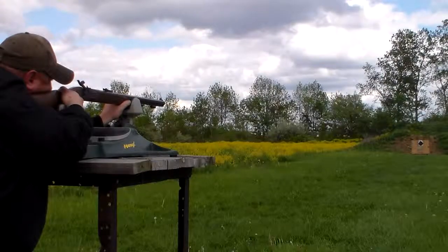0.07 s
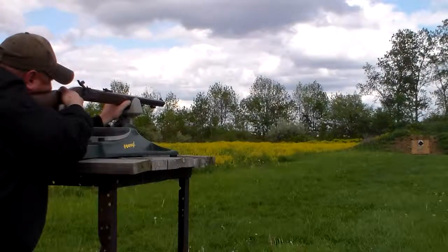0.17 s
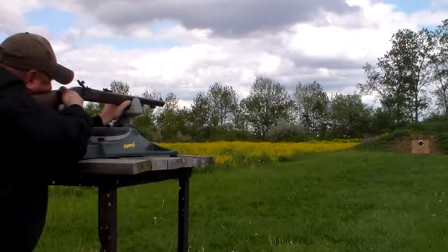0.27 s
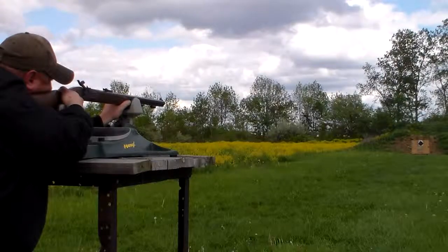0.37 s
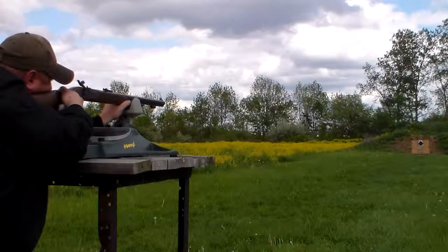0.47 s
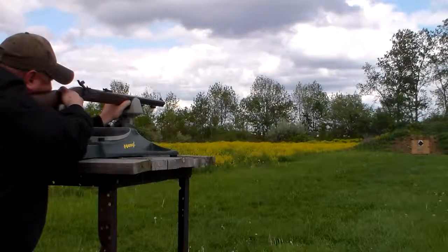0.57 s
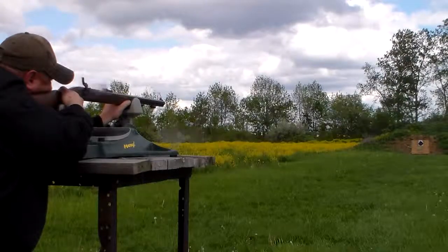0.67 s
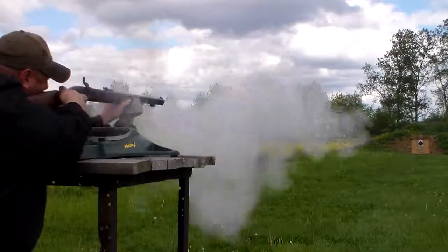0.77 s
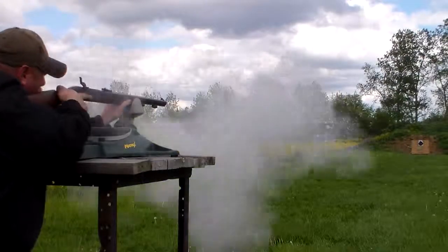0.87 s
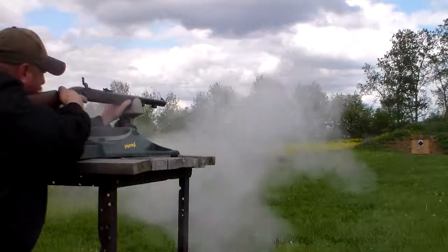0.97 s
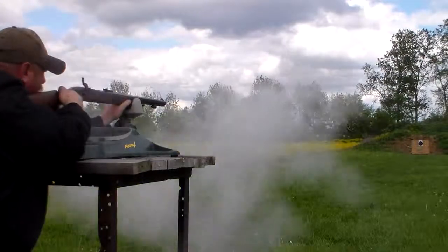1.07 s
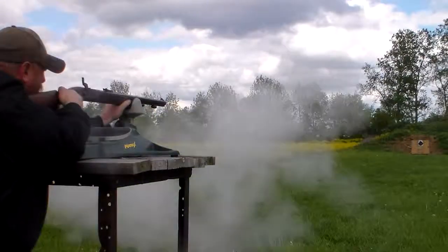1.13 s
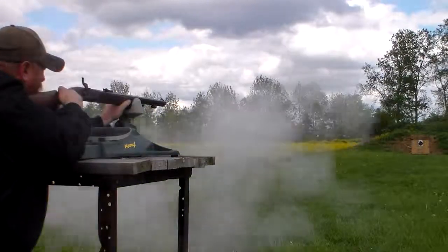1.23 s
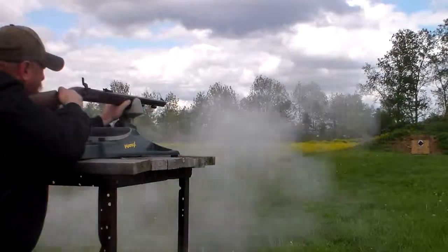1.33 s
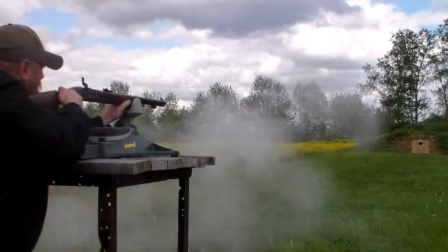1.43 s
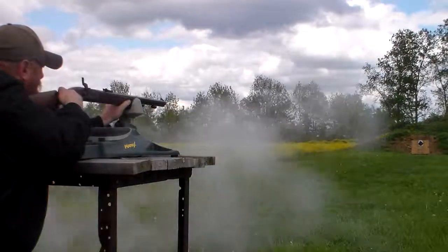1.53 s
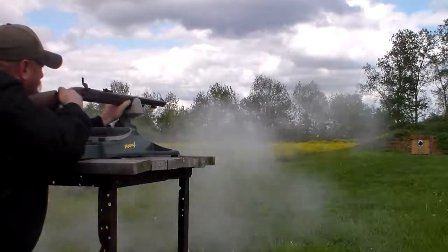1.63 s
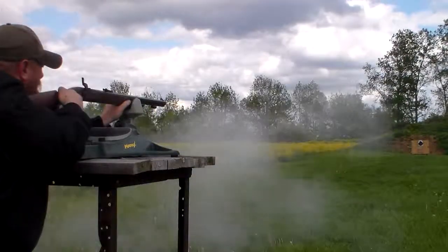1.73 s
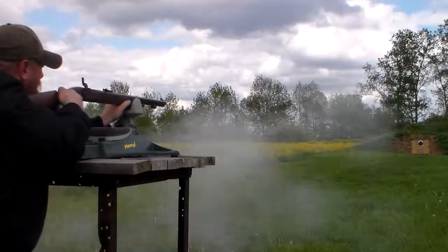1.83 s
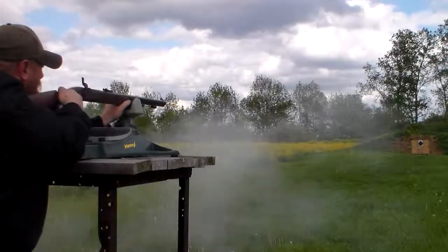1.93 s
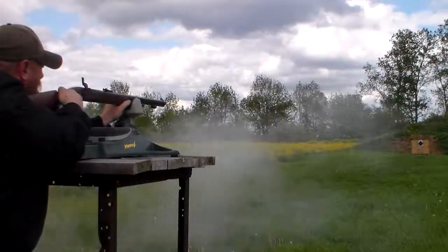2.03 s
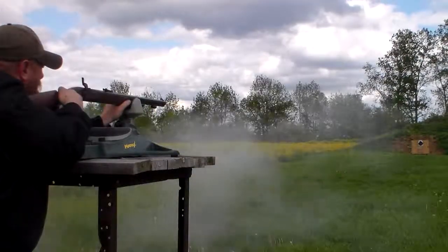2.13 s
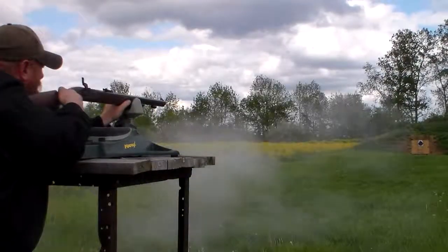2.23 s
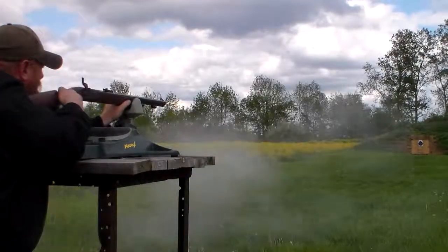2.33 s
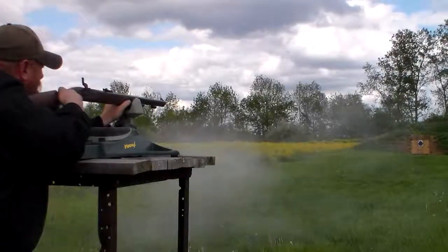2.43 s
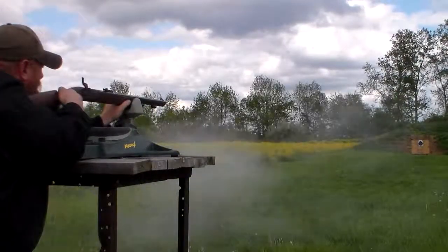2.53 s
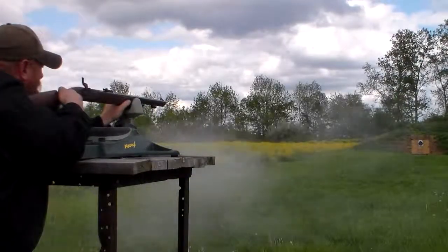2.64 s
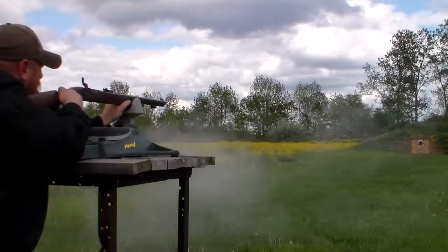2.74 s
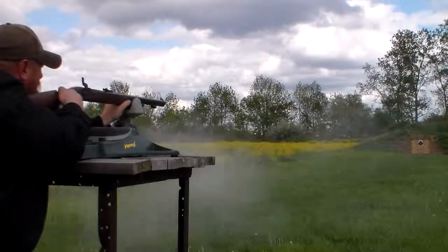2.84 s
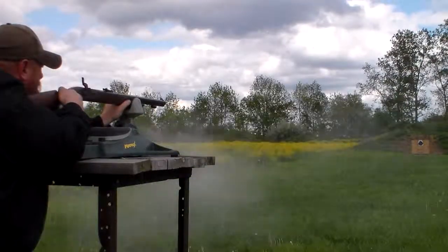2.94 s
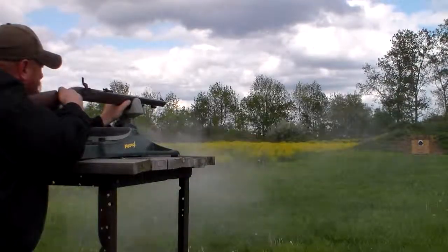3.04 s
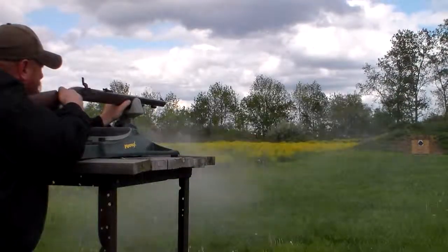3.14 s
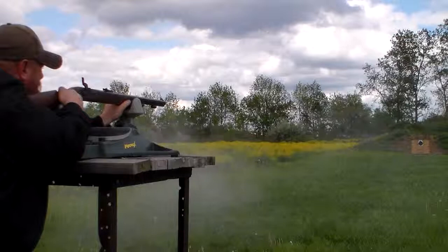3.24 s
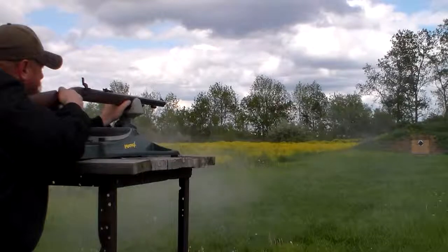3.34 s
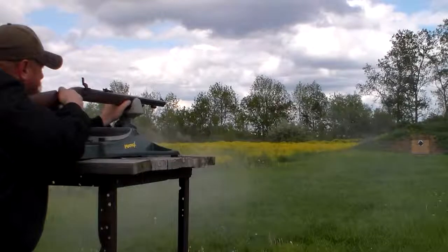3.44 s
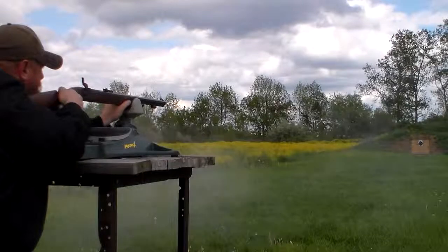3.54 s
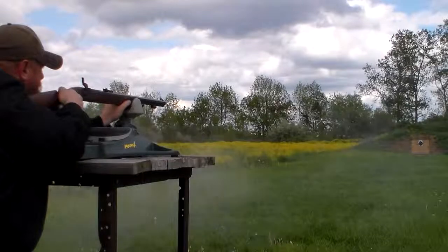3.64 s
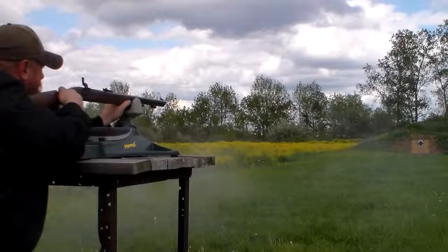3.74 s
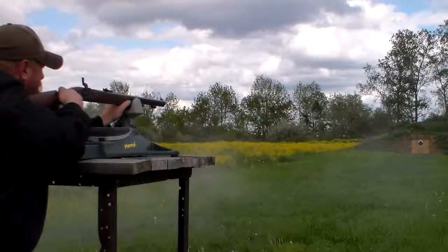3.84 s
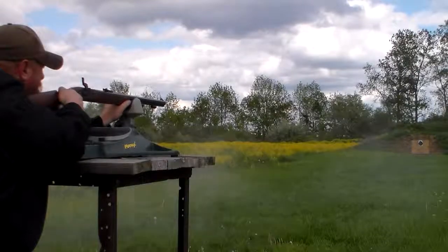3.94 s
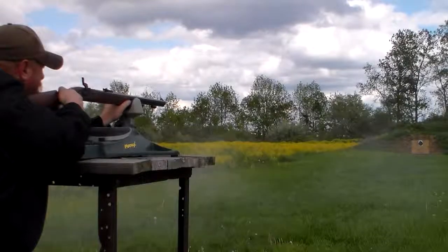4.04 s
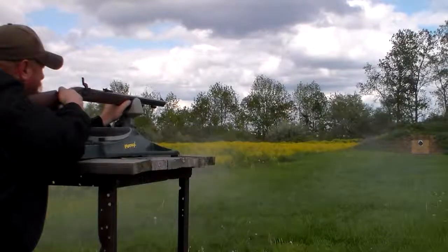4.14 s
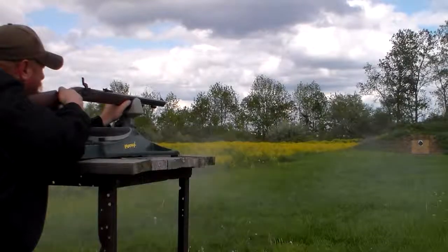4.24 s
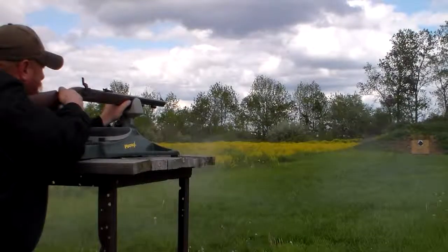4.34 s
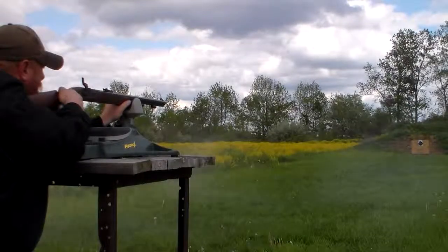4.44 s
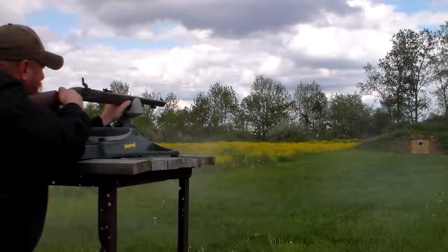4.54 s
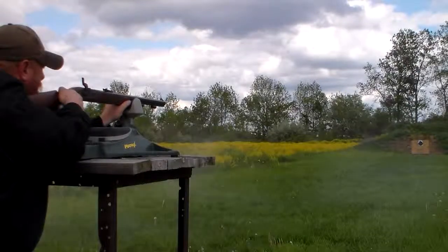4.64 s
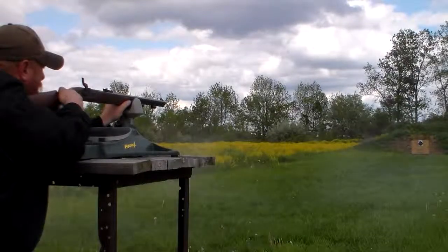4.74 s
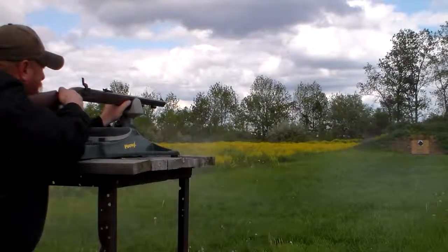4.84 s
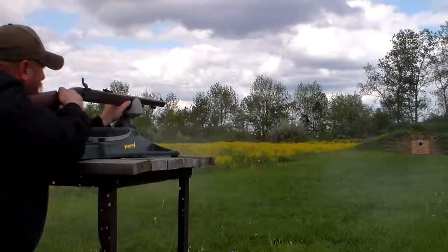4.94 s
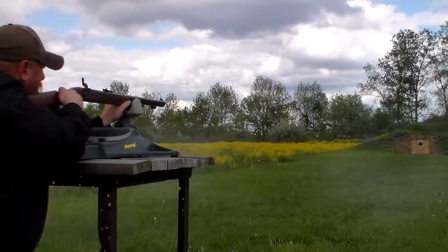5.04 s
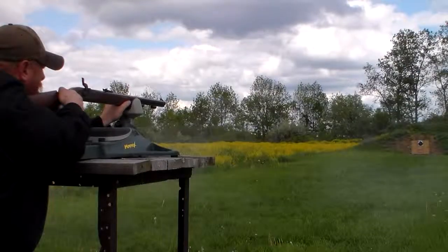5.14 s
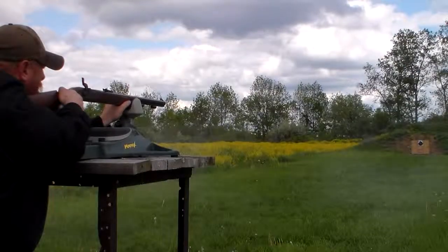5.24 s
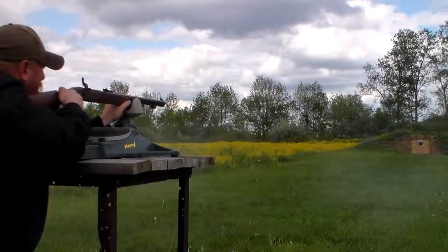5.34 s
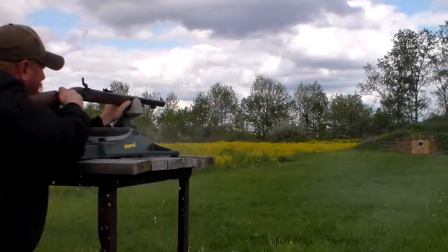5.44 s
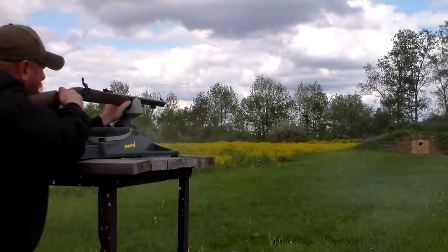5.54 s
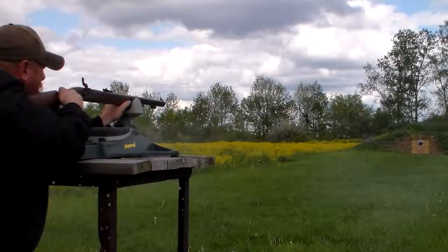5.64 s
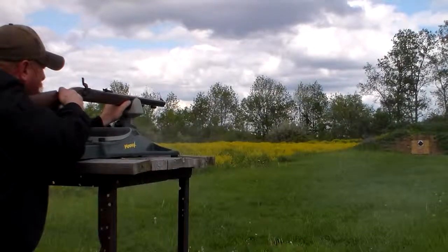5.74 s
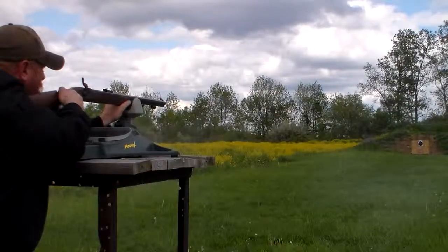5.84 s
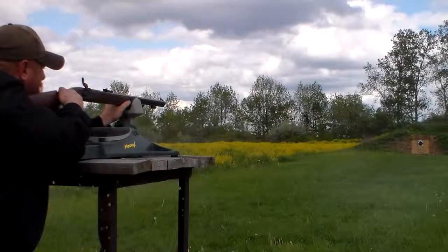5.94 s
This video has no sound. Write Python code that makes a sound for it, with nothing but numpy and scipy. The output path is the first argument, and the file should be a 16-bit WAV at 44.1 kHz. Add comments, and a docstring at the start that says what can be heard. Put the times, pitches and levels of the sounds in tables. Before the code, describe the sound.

For the first 0.86 seconds there is only quiet open air: lumpy low wind, slightly stronger on the left, a distant road wash and a far engine humming low near 125 Hz. A tiny cap snap at 0.86 runs into a massive muzzle blast at 0.88, so loud the close microphone clips. Hollow bench and wall echoes crowd in until 0.96, a sharp ringing board smack lands at 1.13, and berm and tree slaps continue to about 1.47 over a grainy, darkening woodland roll. Background is pushed down, then recovers by about 2 seconds. The hum swells near 2.7 and dips at 3.2. Thin high bird notes quicken from 2.4 to 3.8, with faint chips and a buzzy trill; brighter scooping whistles come at 4.2 and 4.5. A thin whine rises near 4.75. Soft bumps at 5.2-5.9 and a small tick at 5.6 finish.

```python
"""A single muzzleloader shot on an open range

A muzzleloader is fired once from a bench, so loud that the nearby microphone overloads.
Cap, ignition and muzzle blast, made of noise bursts, follow within 20 ms; the ball slaps a ringing board.
Berm, walls, banks and trees send back more bursts, and woods add a long roll of noise.
A far engine hums in wavering sine tones, filtered noise makes wind, road and leaves, gliding tones make birds.
Automatic gain control turns everything down after the shot, then lets the quiet sounds return."""
import sys
import numpy as np
from scipy import signal
from scipy.fft import irfft, next_fast_len
from scipy.io import wavfile
from scipy.ndimage import minimum_filter1d

SR = 44100
rng = np.random.default_rng(int(sys.argv[2]) if len(sys.argv) > 2 else 0)


def unload_wav(signal):
    """Save mono or channel-first audio to the path in sys.argv[1] as 16-bit WAV at rate SR, clipped to [-1, 1]."""
    wavfile.write(
        sys.argv[1],
        SR,
        np.round(np.clip(np.atleast_2d(signal).T, -1, 1) * 32767).astype(np.int16),
    )


N = 264644

# In all tables t60 is the time to fade by 60 dB, and levels are relative, before any swell or waver.
FIRE_S = 0.8812  # moment of the muzzle blast
# how alike left and right are in the road noise and the leaves: f/Hz, likeness (1 = identical)
AIR_LIKENESS = [(600, 0.99), (1400, .89), (3100, 0.52), (6800, .1)]


def amp(db):
    """Turns decibels into a gain."""
    return 10 ** (np.asarray(db) / 20)


def unit(x):
    """Scales a sound to an average strength (rms) of 1."""
    return x / np.sqrt(np.mean(x ** 2) + 1e-20)


def read(points, hz):
    """Reads a table between its points, on a log-frequency axis."""
    f, value = np.transpose(points)
    return np.interp(np.log(hz + 1), np.log(f + 1), value)


def follow(rows):
    """Turns each column of a time table into a curve with one value a sample."""
    s, *columns = np.transpose(rows)
    return [np.interp(np.arange(N) / SR, s, column) for column in columns]


def add(mix, s, sound):
    """Adds a stereo sound to the mix at a time in seconds."""
    part = mix[:, round(s * SR):][:, :sound.shape[1]]
    part += sound[:, :part.shape[1]]


def band(hz, low_hz, high_hz, steep=2.9, low_steep=2):
    """Gain that passes the pitches between two soft edges."""
    below = 1 + (low_hz / (hz + 1)) ** (2 * low_steep)
    above = 1 + (hz / high_hz) ** (2 * steep)
    return 1 / np.sqrt(below * above)


def noise(size, colour, likeness=None):
    """Stereo noise of rms 1: random phases, with colour giving the gain at each frequency."""
    # usual likeness of left and right: f/Hz, likeness (1 = identical)
    usual_likeness = [(60, .95), (300, .99), (1400, .95), (3100, .93), (6800, .35), (14000, .1)]
    length = next_fast_len(size, real=True)
    hz = np.fft.rfftfreq(length, 1 / SR)
    mid, side = np.exp(2j * np.pi * rng.random((2, len(hz))))
    same = np.clip(read(usual_likeness if likeness is None else likeness, hz), -1, 1)
    mid, side = mid * np.sqrt(1 + same), side * np.sqrt(1 - same)
    ports = np.array([mid + side, mid - side])
    return unit(irfft(ports * colour(hz), length)[:, :size])


def drift(size, rate):
    """Slow random wander of rms 1: straight lines between random points, rate of them a second."""
    knots = np.arange(size) * rate / SR
    count = int(knots[-1]) + 2
    return unit(np.interp(knots, np.arange(count), rng.standard_normal(count)))


def reshape(x, gain):
    """Applies a gain that depends on frequency and time, in short overlapping slices."""
    hz, t, z = signal.stft(x, SR, nperseg=256, noverlap=192)
    shaped = signal.istft(z * gain(hz[:, None], t), SR, nperseg=256, noverlap=192)[1]
    return shaped[:, :x.shape[1]]


def stand(hz):
    """Gain of the resonances of the bench and firing point, each a peak around its own pitch."""
    # the resonances: f/Hz, width/Hz, level/dB
    resonances = [(247.1, 42, 5.5), (327, 24, 3.5), (414, 9.3, 8), (567, 28, 9), (1180, 210, 3),
                  (1790, 200, 0.5), (3243, 1000, 3.5)]
    return amp(sum(db / (1 + (2 * (hz - f) / width) ** 2) for f, width, db in resonances))


def burst(db, rise, t60, low_hz, high_hz, low_steep=2):
    """A puff of band noise that swells and dies, coloured by the firing point."""
    t = np.arange(SR // 2) / SR
    puff = noise(len(t), lambda hz: band(hz, low_hz, high_hz, low_steep=low_steep) * stand(hz))
    return puff * amp(db - 60 * t / t60) * (1 - np.exp(-t / rise))


def rifle(jet_db=15, jet_s=0.018, ring_db=10):
    """Cap and ignition, then the gas jet, its dying scatter and a slow pressure swing."""
    # the lock and the charge: t/s, level/dB, t60/s, lower edge/Hz, upper edge/Hz
    ignition = [(0.8636, -18, 0.062, 1500, 11190), (0.875, -1.5, 0.02, 681.4, 4485)]
    # tone colour of the blast: f/Hz, relative level/dB per Hz
    blast = [(59, -45), (100, -19), (224, -7), (293, -18), (400, -11), (713, -15), (1170, -13.5),
             (1600, -15), (1730, -15), (3230, -16), (3890, -18.5), (6250, -16.5), (14000, -27)]
    # how long the scatter takes to fade: f/Hz, t60/s
    blast_t60 = [(150, .15), (600, .16), (2500, .19), (6000, .235), (13000, .235)]
    swing_db, swing_zero_s, swing_rise_s = 18.5, 0.041, 0.02  # size, first zero without delay, rise
    out, t = np.zeros((2, N)), np.arange(SR) / SR
    for s, db, t60, low_hz, high_hz in ignition:
        add(out, s, burst(db, 1 / SR, t60, low_hz, high_hz))
    colour = lambda hz: amp(read(blast, hz)) * stand(hz)
    jet = noise(SR, colour) * amp(jet_db) * np.sin(np.pi * np.minimum(t / jet_s, 1)) ** 2
    scatter = reshape(noise(SR, colour), lambda hz, age: amp(ring_db - 60 * age / read(blast_t60, hz)))
    add(out, FIRE_S, jet + scatter * (1 - np.exp(-t / 0.004)))
    # the blast drives the microphone to one side, and it creeps back with an overshoot
    u = t / swing_zero_s
    swing = -amp(swing_db) * (1 - u) * np.exp(-u) * (1 - np.exp(-t / swing_rise_s))
    add(out, FIRE_S + 0.006, np.array([swing, swing]))
    return out


def target(rise_s=0.00017, ground_s=0.0026, ground_db=-9, snap_db=5, snap_t60=0.0034,
           snap_low_hz=300, snap_high_hz=5500):
    """The ball snaps through the board, which rings briefly; the ground repeats the slap."""
    # the board's ringing tones: f/Hz, level/dB, t60/s
    board = [(570, -1, 0.035), (1210, -4, 0.007), (1980, 7, 0.0059), (2400, -1.5, .009), (3610, 3, 0.01),
             (4090, 3.5, 0.0084), (7100, -5, .007)]
    slap_s = 1.1308
    out, t = np.zeros((2, N)), np.arange(SR // 2) / SR
    slap = np.zeros(len(t))
    for k, (hz, db, t60) in enumerate(board):
        slap += (-1) ** k * amp(db - 60 * t / t60) * np.sin(2 * np.pi * hz * t)
    snap = noise(len(t), lambda hz: band(hz, snap_low_hz, snap_high_hz, steep=1.3))[0]
    snap = snap * amp(snap_db - 60 * t / snap_t60)
    slap = (slap + snap) * (1 - np.exp(-t / rise_s))
    ports = np.array([np.roll(slap, 1), slap])  # the left port hears it one sample later
    add(out, slap_s, ports)
    add(out, slap_s + ground_s, ports * amp(ground_db))
    return out


def echoes(grain_db=3, roll_low_hz=560):
    """Separate returns of the shot, and a grainy roll from countless trunks that dulls with time."""
    # the bench's hollow answer: t/s, level/dB, rise/s, t60/s, lower edge/Hz, upper edge/Hz
    bench = (.895, 3.5, .002, .19, 220, 600)
    # the brighter splash from the berm behind the target, same columns
    berm = (1.1657, -17, 1, 0.1748, 400, 4600)
    # full echoes from structures near the firing point: t/s, level/dB
    walls = [(.9296, 5), (.945, 1.5), (.957, -8.5)]
    # their shape: rise/s, t60/s, lower edge/Hz, upper edge/Hz
    wall_shape = (.0006, .115, 185, 2000)
    # dull thuds from earth banks: t/s, level/dB
    banks = [(1.034, -13), (1.109, -11), (1.157, -10)]
    # their shape: rise/s, t60/s, lower edge/Hz, upper edge/Hz
    bank_shape = (.004, .11, 145, 320)
    # short slaps from single trees: t/s, level/dB
    trees = [(1.114, -15.5), (1.1653, -12.5), (1.2126, -21), (1.261, -11), (1.281, -13), (1.330, -18.5),
             (1.345, -14.5), (1.366, -21.5), (1.47, -25.5)]
    # their shape: rise/s, t60/s, lower edge/Hz, upper edge/Hz, steepness of the lower edge
    tree_shape = (.0006, .043, 780, 2100, 3.6)
    # stands of wood that roll the shot back: arrival t/s, hold/s, level/dB, t60/s
    woods = [(0.925, .012, -23.5, 0.68), (1.079, 0.044, -25.5, 0.45), (1.193, 0.11, -33, 0.54),
             (1.443, 0.053, -28, 0.32), (1.606, 0.25, -38, 2.7)]
    woods_attack_s = 0.048
    start_edge_hz, halving_s = 5780, 0.5  # air has halved the roll's upper edge after this much travel
    out, t = np.zeros((2, N)), np.arange(N) / SR
    for s, *shape in (bench, berm):
        add(out, s, burst(*shape))
    for returns, shape in (walls, wall_shape), (banks, bank_shape), (trees, tree_shape):
        for s, db in returns:
            add(out, s, burst(db, *shape))

    edge = lambda s: start_edge_hz / (1 + np.maximum(s - FIRE_S, 0) / halving_s)

    def roll_gain(hz, s):
        """Narrows the band with time; the square root makes up for the strength lost."""
        return band(hz, roll_low_hz, edge(s), steep=3.2, low_steep=3.5) * np.sqrt(SR / 2 / edge(s))

    roll = reshape(noise(N, np.ones_like), roll_gain)
    swells = []
    for s, hold, db, t60 in woods:
        attack = np.clip((t - s) / woods_attack_s, 0, 1)
        fading_s = np.maximum(t - s - woods_attack_s - hold, 0)
        swells.append(attack * amp(db - 60 * fading_s / t60))
    # independent woods add up by power
    return out + roll * np.linalg.norm(swells, axis=0) * amp(grain_db * drift(N, rate=340))


def handling(lean_db=4):
    """Soft bumps at the bench and one small tick, noise puffs leaning to the shooter's side, the left."""
    # the bumps: t/s, level/dB
    bumps = [(5.225, -32), (5.445, -29), (5.776, -24), (5.881, -30)]
    # their shape: rise/s, t60/s, lower edge/Hz, upper edge/Hz
    bump_shape = (.005, .15, 42, 160)
    # the tick: t/s, level/dB, rise/s, t60/s, lower edge/Hz, upper edge/Hz
    tick = (5.5985, -45, .0002, .011, 4800, 9000)
    out = np.zeros((2, N))
    for s, db in bumps:
        add(out, s, burst(db, *bump_shape))
    add(out, tick[0], burst(*tick[1:]))
    return out * amp([[lean_db], [-lean_db]])


def birds(trill_wet_db=1, lean_db=1, trill_rate=61, trill_sweep_hz=850):
    """Gliding whistles and farther trills of quick upsweeps, ringing on among the trees."""
    # buzzy trills: t/s, length/s, centre f/Hz, level/dB
    buzzes = [(3.855, .27, 4380, -58.5), (4.31, .19, 4450, -64.5), (4.99, .14, 3050, -61)]
    whistle_wet_db, woods_t60 = -7.5, 0.42  # how loud and how long (s) the trees carry the notes on
    whistles, trills = np.zeros((2, 2, N))

    def tone(hz):
        """A sine that follows a pitch curve, with soft ends."""
        return np.sqrt(2) * np.sin(2 * np.pi * np.cumsum(hz) / SR) * signal.windows.tukey(len(hz), 0.55)

    for s, length, first_hz, last_hz, glide, db in songs():
        t = np.arange(int(length * SR)) / SR
        hz = last_hz + (first_hz - last_hz) * np.exp(-t / glide)
        hz = hz * (1 + 0.0033 * drift(len(t), rate=245))
        add(whistles, s, tone(hz) * amp([[db + lean_db], [db - lean_db]]))
    for s, length, centre_hz, db in buzzes:
        size = int(length * SR)
        # position within each upsweep, from 0 to 1
        cycle = np.cumsum(trill_rate * (1 + 0.08 * drift(size, rate=60))) / SR % 1
        hz = centre_hz + trill_sweep_hz * (cycle - 0.5) + 110 * drift(size, rate=250)
        add(trills, s, tone(hz) * np.sin(np.pi * cycle) * amp([[db], [db]]))
    tail = noise(SR, np.ones_like) * amp(-60 * np.arange(SR) / SR / woods_t60)
    sent = amp(whistle_wet_db) * whistles + amp(trill_wet_db) * trills
    ringing = signal.fftconvolve(sent, tail / np.linalg.norm(tail[0]), axes=1)[:, :N]
    return whistles + trills + ringing


def songs(count=3):
    """Lists the notes of three birds: t/s, length/s, first f/Hz, last f/Hz, glide time/s, level/dB."""
    # one bird's quickening series of thin notes, sinking in pitch: t/s, length/s, level/dB
    series = [(2.384, 0.11, -60.5), (2.739, 0.11, -50.5), (3.024, 0.083, -55), (3.256, 0.1, -51),
              (3.429, .1, -55), (3.57, 0.062, -55.5), (3.694, .044, -51), (3.806, .038, -51.5)]
    series_hz, sag_hz_per_s, droop_hz, glide_s = 6213, 214.5, 70, 0.034
    # another bird's chip, scoop and high whistle:
    # delay/s, length/s, first f/Hz, last f/Hz, glide time/s, level within the phrase/dB
    phrase = [(0, 0.02, 3810, 3250, 0.014, -8), (.031, 0.086, 2470, 3264, .018, 0.5),
              (0.138, 0.16, 4600, 7425, .0095, -19)]
    # each time that phrase is sung: t/s, level/dB
    phrases = [(4.165, -42.5), (4.537, -42)]
    # a far bird's faint chip: length/s, first f/Hz, last f/Hz, glide time/s
    chip = (0.021, 2300, 2830, 0.016)
    chips_s, chip_gap_s, chip_db = 3.535, 0.13, -59  # an even run of chips
    notes = []
    for s, length, db in series:
        hz = series_hz - sag_hz_per_s * (s - series[0][0])
        notes.append((s, length, hz + droop_hz, hz, glide_s, db))
    for s, db in phrases:
        notes += [(s + delay, *shape, db + note_db) for delay, *shape, note_db in phrase]
    return notes + [(chips_s + k * chip_gap_s, *chip, chip_db) for k in range(count)]


def engine(hum_db=0.0, waver_db=1.37, whine_jitter=0.009):
    """A far engine's firing note and its octave, wavering in the moving air, and a thin whine."""
    # level of the firing note up to the shot: t/s, level/dB
    early = [(0.0, -35), (0.036, -39), (0.8, -35)]
    # and after it, same columns
    late = [(1.8, -35.5), (2.32, -36.5), (2.66, -29), (2.95, -31.5), (3.22, -48), (3.8, -36.5),
            (4.66, -43.5), (4.74, -49), (5.7, -44)]
    # level of the second harmonic: t/s, level/dB
    octave = [(0, -51.5), (.6, -44.5), (2.6, -58.5), (3.05, -47.5), (3.6, -59.5), (5.1, -59), (5.8, -52)]
    # level of the thin far whine: t/s, level/dB
    whine_levels = [(0, -59), (4.5, -57), (4.75, -42), (5.05, -57.5), (5.5, -51), (5.7, -54), (5.85, -46),
                    (6, -58.5)]
    firing_hz, whine_hz = 125.75, 745.5  # centres that the pitches wander around
    level, = follow(list(early) + list(late))
    second, = follow(octave)
    whine_level, = follow(whine_levels)
    phase = 2 * np.pi * np.cumsum(firing_hz * (1 + 0.007 * drift(N, rate=22))) / SR
    hum = amp(level + hum_db + waver_db * drift(N, rate=18)) * np.sin(phase)
    hum += amp(second + 2 * waver_db * drift(N, rate=11)) * np.sin(2 * phase)
    whine_phase = 2 * np.pi * np.cumsum(whine_hz * (1 + whine_jitter * drift(N, rate=70))) / SR
    whine = amp(whine_level + 2 * drift(N, rate=41)) * np.sin(whine_phase)
    return np.sqrt(2) * (hum + whine)


def air(wind_db=4.5, road_db=3, gust_db=1.9):
    """Lumpy low wind noise at the microphone over the wash of a distant road."""
    # levels up to the shot: t/s, wind level/dB, road level/dB
    early = [(0.0, -43, -47), (0.108, -38.5, -47.5), (0.8, -40.5, -46)]
    # and after it, same columns
    late = [(2.4, -47, -46.5), (2.47, -46.5, -49.5), (4.84, -49.5, -45), (5.19, -44, -48.5),
            (5.7, -47, -46)]
    # tone colour of the wind: f/Hz, relative level/dB per Hz
    wind_colour = [(10, -3), (30, -2.5), (70, -2), (100, -4.5), (160, -5.5), (230, -14.5), (400, -32),
                   (1000, -59.5)]
    # tone colour of the road: f/Hz, relative level/dB per Hz
    road_colour = [(40, -11), (180, -5), (300, -4), (420, -5), (600, -1.5), (780, -0.5), (1150, -2.5),
                   (1500, -10), (2100, -21.5), (3500, -31.5), (5000, -39), (14000, -57)]
    wind_level, road_level = follow(list(early) + list(late))
    wind = noise(N, lambda hz: amp(read(wind_colour, hz)), [(40, 0.55), (200, 0.6)])  # f/Hz, likeness
    road = noise(N, lambda hz: amp(read(road_colour, hz)), AIR_LIKENESS)
    wind = wind * amp(wind_level + wind_db + gust_db * drift(N, rate=22))
    wind = wind * amp([[2.5], [-1.5]])  # stronger on the left
    return wind + road * amp(road_level + road_db + 0.84 * drift(N, rate=6.3))


def leaves(low_hz=2400, high_hz=3700, flutter_db=1.5):
    """Leaves along the field's edge: a faint band of noise with a fluttering level."""
    # how strongly they stir: t/s, level/dB
    stirring = [(0, -66), (.8, -73), (2.5, -64.5), (3.6, -60.5), (5.2, -64), (6, -63.5)]
    rustle = noise(N, lambda hz: band(hz, low_hz, high_hz, steep=4), AIR_LIKENESS)
    return rustle * amp(follow(stirring)[0] + flutter_db * drift(N, rate=37))


def scene():
    """Adds up everything that reaches the microphone."""
    return rifle() + target() + echoes() + handling() + birds() + engine() + air() + leaves()


def record(dry, threshold_db=-4, depth_db=14, hold_s=0.67, recovery_db_per_s=55, attack_s=0.005,
           hiss_db=-62.0):
    """Gain control drops, holds and recovers; then preamp hiss, hard clipping and the band limit."""
    edge_hz = 14500
    # the control listens to the left port, without the lowest rumble
    sensed = signal.sosfilt(signal.butter(2, 100, "high", fs=SR, output="sos"), dry[0])

    def smooth(x, s):
        """Running average that forgets over s seconds."""
        keep = np.exp(-1 / (s * SR))
        return signal.lfilter([1 - keep], [1, -keep], x)

    level_db = 10 * np.log10(smooth(sensed ** 2, attack_s) + 1e-12)
    over_db = np.clip(level_db - threshold_db, 0, depth_db)
    # keep the largest reduction of the last hold_s seconds, then let go at a steady rate
    half = int(hold_s * SR / 2)
    held = -minimum_filter1d(-over_db, 2 * half + 1, origin=half)
    fall = np.arange(N) * recovery_db_per_s / SR
    reduction_db = np.maximum.accumulate(held + fall) - fall
    gain = amp(-smooth(reduction_db, attack_s))
    # part of the hiss arises before the gain stage, so it ducks less
    hiss = amp(hiss_db) * rng.standard_normal((2, N)) * np.sqrt(gain)
    clipped = np.clip(dry * gain + hiss, -1, 1)
    low_pass = signal.firwin(511, edge_hz, window=("kaiser", 9), fs=SR)
    return signal.oaconvolve(clipped, low_pass[None], "same")


dry = scene()
out = record(dry)
unload_wav(out)
```